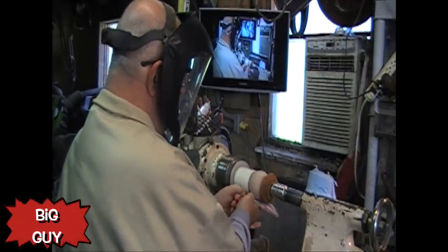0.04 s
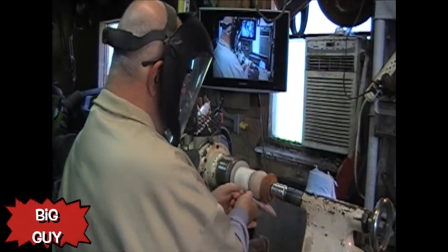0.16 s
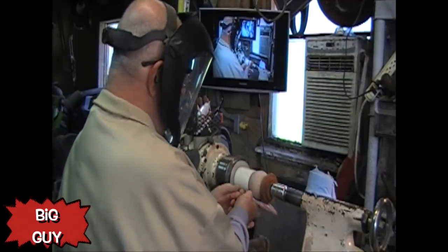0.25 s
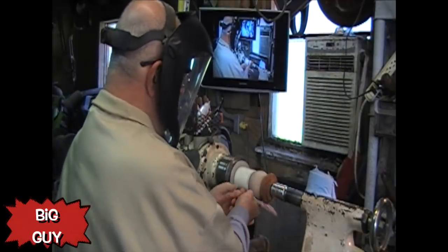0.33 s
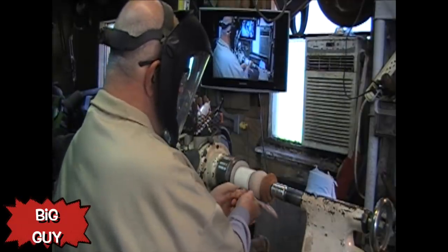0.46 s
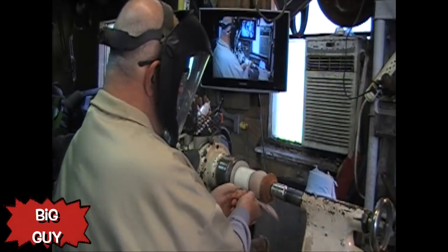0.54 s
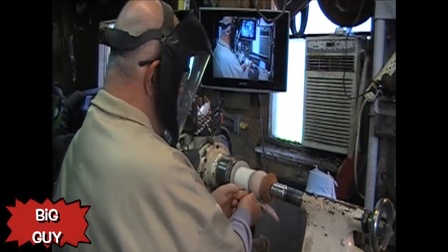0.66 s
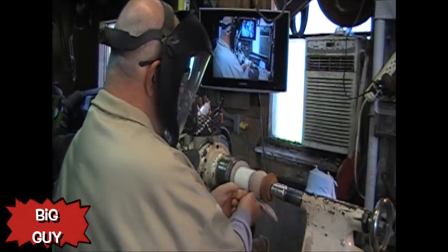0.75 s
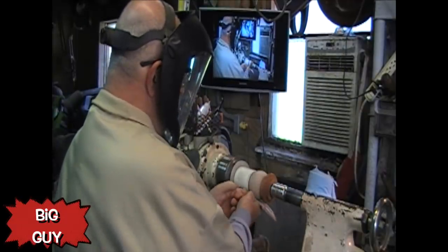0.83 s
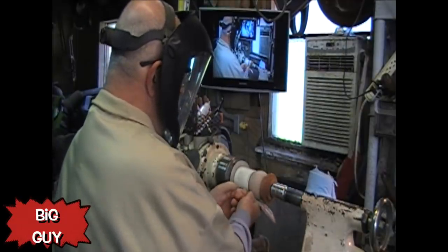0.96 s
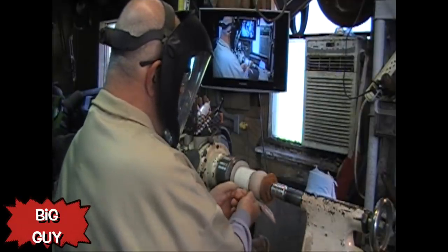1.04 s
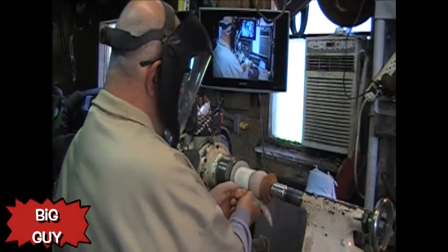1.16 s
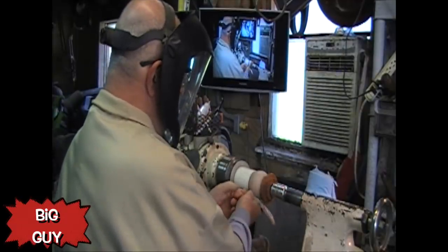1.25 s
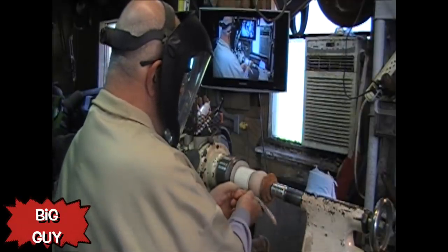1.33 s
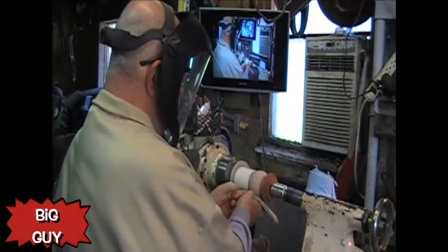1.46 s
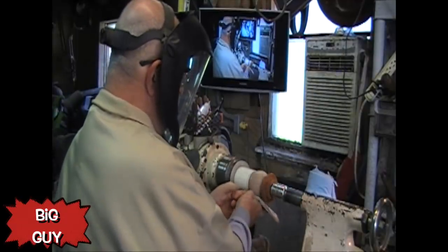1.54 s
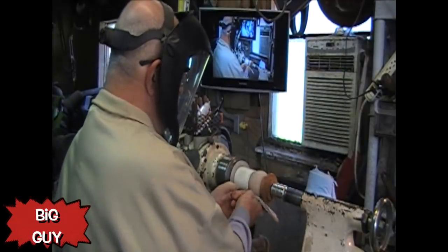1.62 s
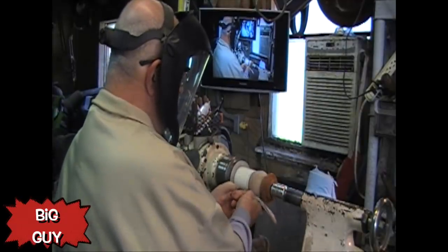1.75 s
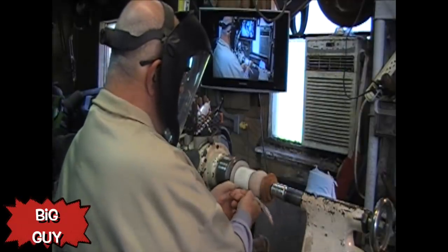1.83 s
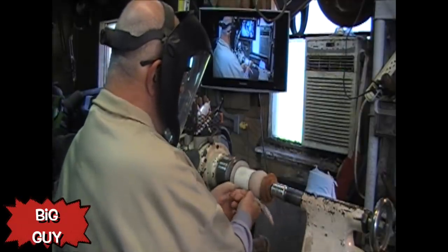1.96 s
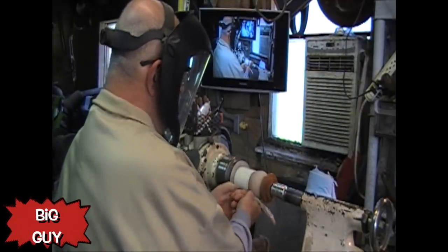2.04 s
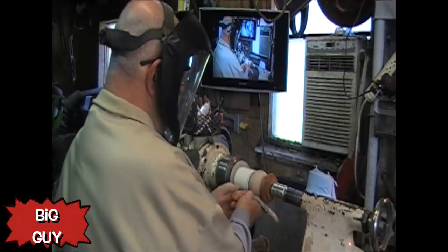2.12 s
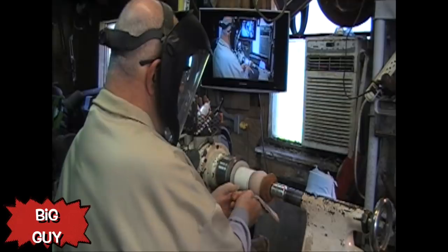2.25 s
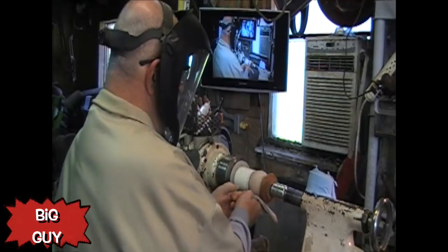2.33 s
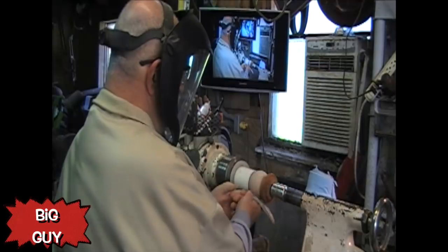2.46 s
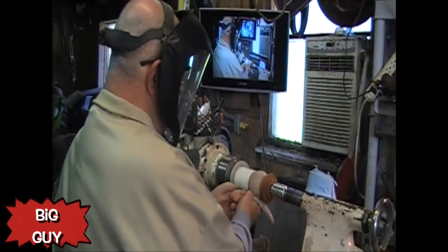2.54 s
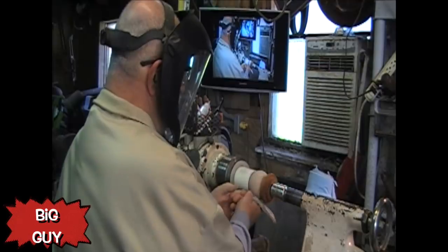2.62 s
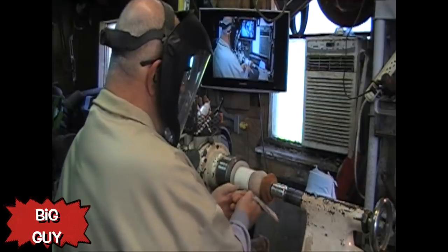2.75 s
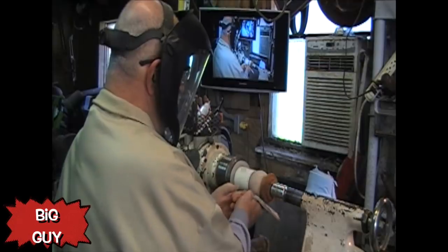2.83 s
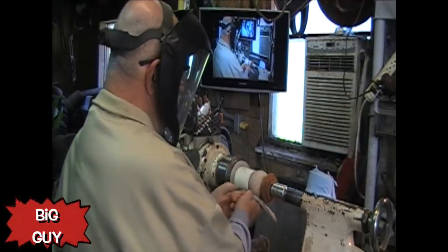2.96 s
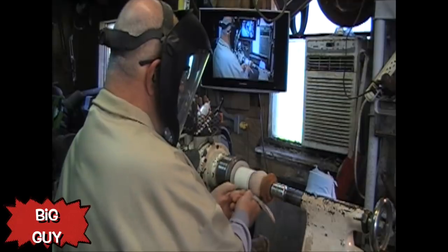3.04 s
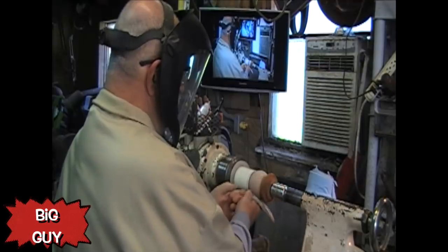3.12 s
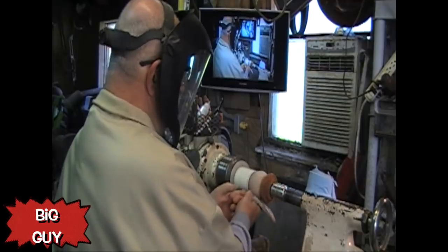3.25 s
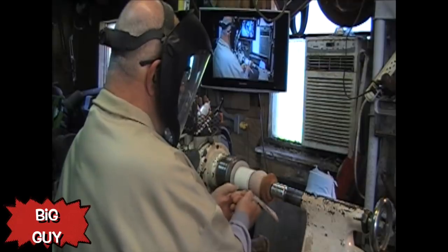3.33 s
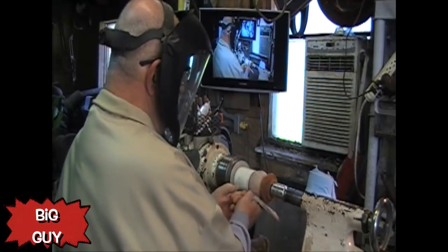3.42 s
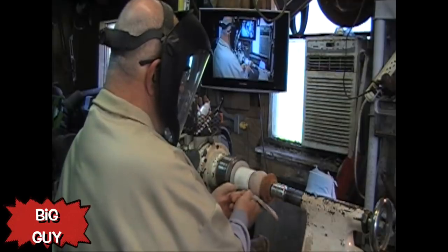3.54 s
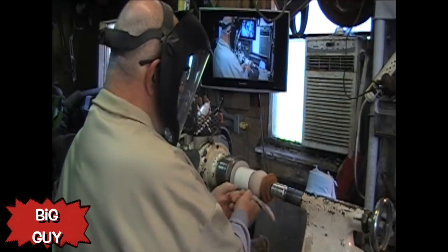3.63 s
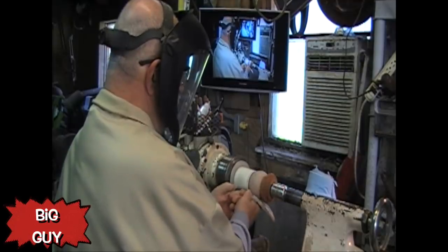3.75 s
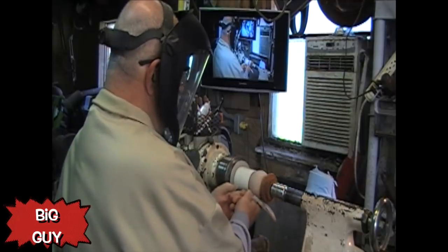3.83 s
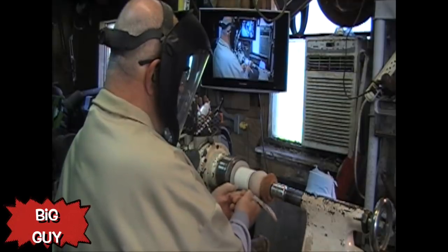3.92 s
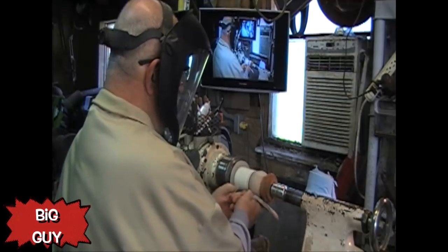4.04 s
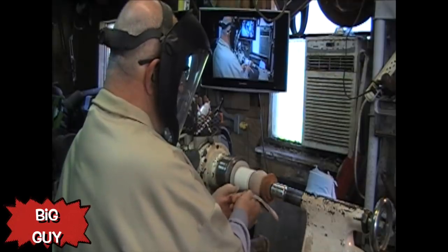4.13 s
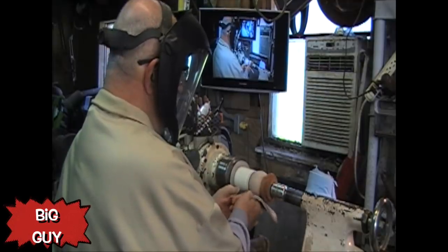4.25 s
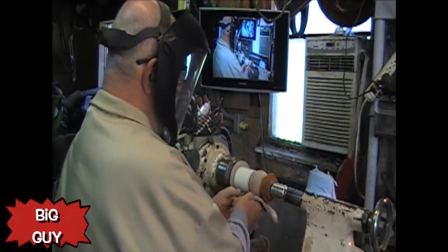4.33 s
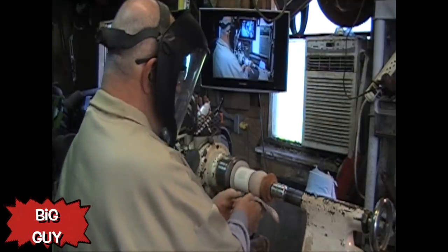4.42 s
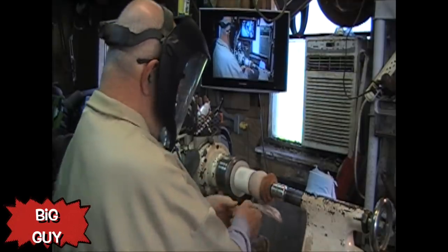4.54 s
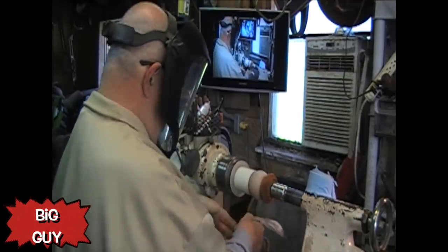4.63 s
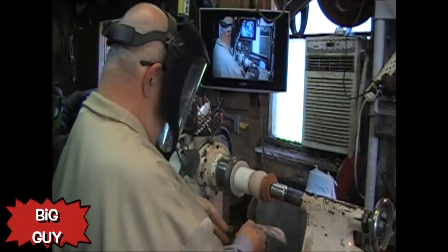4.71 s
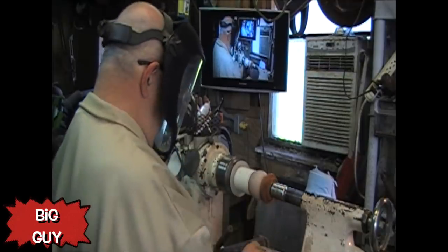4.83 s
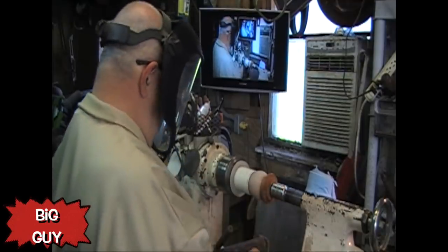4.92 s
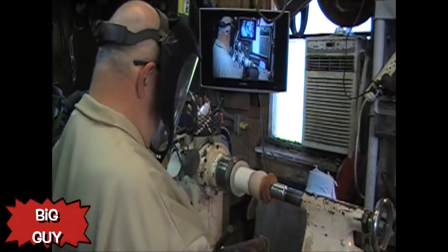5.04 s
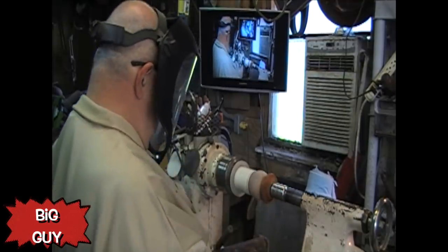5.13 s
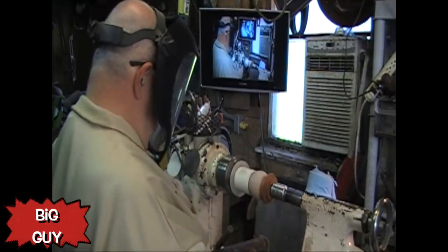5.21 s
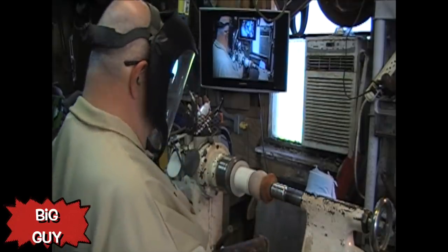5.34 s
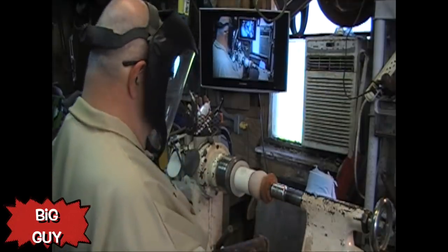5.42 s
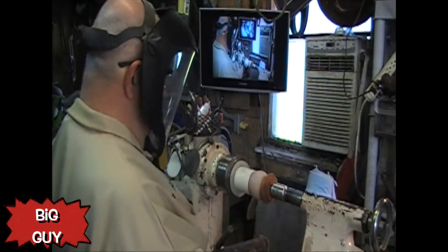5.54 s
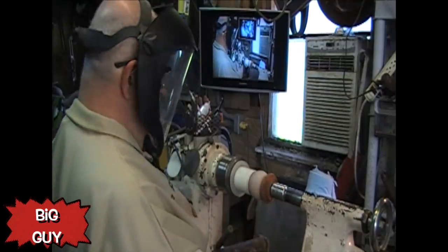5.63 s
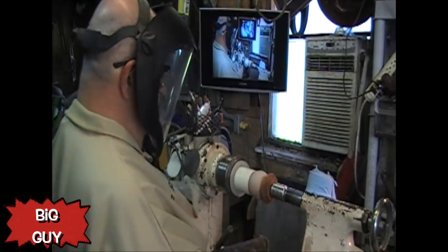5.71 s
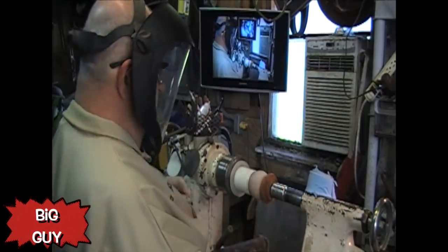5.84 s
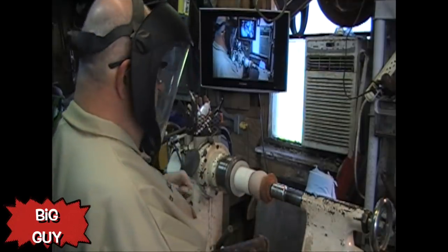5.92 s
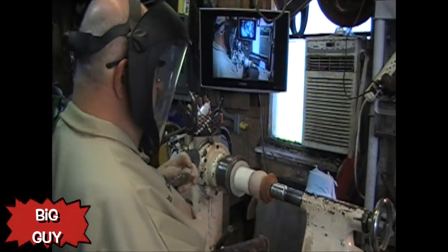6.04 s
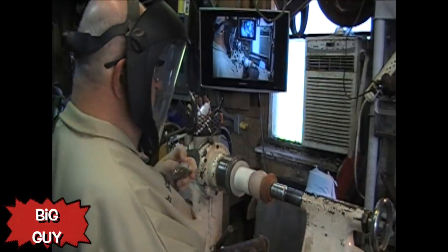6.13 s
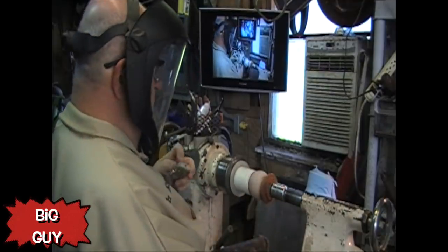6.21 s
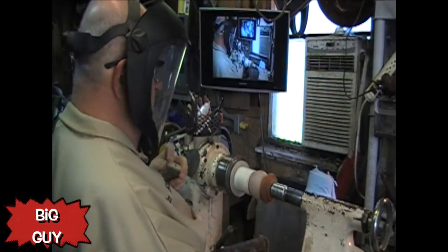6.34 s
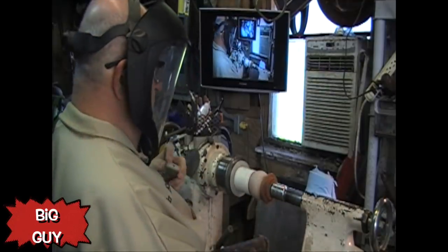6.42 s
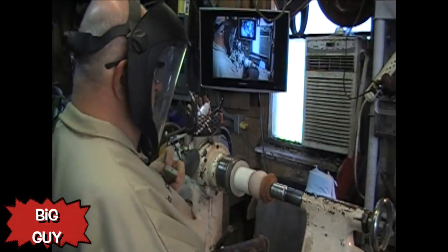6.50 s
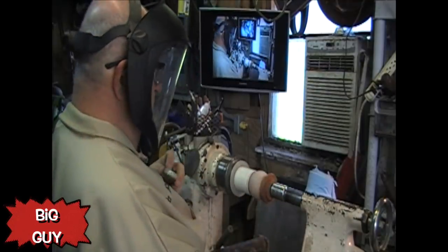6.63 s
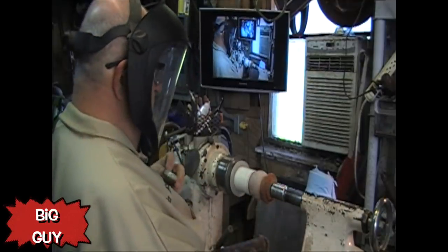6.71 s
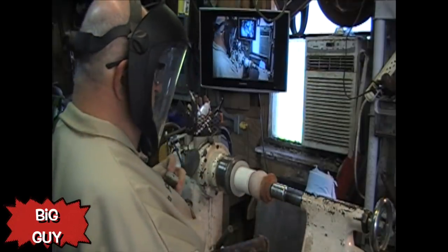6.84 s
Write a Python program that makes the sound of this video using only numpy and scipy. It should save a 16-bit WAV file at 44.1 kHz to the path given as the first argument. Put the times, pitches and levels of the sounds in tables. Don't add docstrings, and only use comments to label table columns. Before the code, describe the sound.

Sandpaper rasps brightly against a wooden ball spinning on a lathe, pulsing with each turn, then lifts off, leaving the motor humming with small knocks.

```python
import sys
import numpy as np
from scipy import signal
from scipy.fft import rfft, irfft, next_fast_len
from scipy.io import wavfile

SR = 44100
rng = np.random.default_rng(int(sys.argv[2]) if len(sys.argv) > 2 else 0)


def volts_from_decibels(level):
    exponent = np.asarray(level, float) / 20
    return 10 ** exponent


def int16_out(signal):
    q = np.round(np.clip(np.atleast_2d(signal).T, -1, 1) * 32767)
    wavfile.write(sys.argv[1], SR, q.astype(np.int16))


N = 302967
T = np.arange(N) / SR
SIZE = next_fast_len(N + SR // 2)
HZ = np.maximum(np.arange(SIZE // 2 + 1) * SR / SIZE, 1)

SANDING_DB, LIFT_S = -23.5, 4.465
BRUSH_DB, BRUSH_S = -18, 0.046
FRESH_UNTIL_S, CLOG_S = 0.63, 0.028
TURN_HZ = 14.91
ROAR_DB, AIR_DB = -40, -78
BELT_HZ, BELT_DB, BELT_ANGLE_RAD = 12, 2.5, 0.2
BED_HZ, BED_WANDER_HZ, SWELL_S = 380.2, 1.76, 0.048
BED_REST_DB, BEAT_HZ, BEAT_DEPTH = -50.5, 7.5, 0.5
SQUEAL_WIDTH_HZ = 74
TICK_T60_S, KNOCK_T60_S = 0.0049, 0.021
SHOP_T60_S, ECHO_DB = 0.17, -13

# [low f/Hz, high f/Hz, index of turn pattern]
VOICES = [(1300, 3000, 0), (3000, 5100, 0), (5100, 6300, 1), (6300, 8000, 1), (8000, 10600, 1),
          (10600, 13200, 2), (13200, 16500, 2)]
# [f/Hz, density/dB per Hz]
CONTACT = [(940, -18), (1600, -16), (2030, -11), (2280, -13), (2780, -6.5), (5020, -9.5), (5730, -2),
           (6600, 1.5), (7420, 2), (8470, 2.5), (9320, 3.5), (11000, -1.5), (12600, -2.5), (14000, -6.5),
           (15600, -11.5)]
# [f/Hz, width/Hz, gain/dB]
PAPER_PEAKS = [(3350, 110, 2.5), (3780, 48, 0), (4080, 60, 2), (4770, 73, 4.5), (7280, 950, 2),
               (7900, 220, 2.5), (9150, 310, -1), (11800, 100, -0.5), (12700, 900, 1)]
# [cycles per turn, then depth/dB and angle/rad for each of three patterns]
TURN = [(1, 1.74, -2.5, 0.94, 2.5, 0.14, -9), (2, 0.58, -2.5, 0.72, -2.5, 0.24, 12),
        (3, 0.24, -5.5, 0.33, -1.5, 0.48, 8), (4, 0.23, -3.5, 0.21, 14.5, 0.16, -12)]
# [t/s, length/s, push/dB, dig of paper edge/dB, skim of its flat/dB]
STROKES = [(0.03, 0.14, 1, 0.5, 0.7), (0.301, 0.32, -0.6, -3, 0.8), (0.443, 0.14, -0.3, 1.5, 1.2),
           (0.601, 0.19, 0.5, 0.2, 1), (0.76, 0.14, 2.5, 0.5, -0.2), (.93, 0.17, 0.8, 0.4, 0),
           (1.036, 0.79, 3, -1.5, .3), (1.3, 0.092, 1, 0, -.3), (1.55, 0.22, -0.7, 0.5, 0.9),
           (1.907, 0.37, 3, -0.45, 0.5), (2.317, 0.18, 0, 1.1, 1.3), (2.533, 0.16, 3.5, 0, 0.5),
           (2.79, 0.085, 0, 0.8, 3), (2.876, 0.27, -0.5, 1.5, 1.3), (3.167, 0.25, 3, -0.8, 0.9),
           (3.427, 0.17, 1.5, 0.5, 1), (3.7, 0.11, .1, -0.1, 1.5), (3.8, 0.31, 4, -0.5, 0.6),
           (4.212, 0.14, 0.5, 0.5, 1.5), (4.445, 0.16, -4.5, 0.4, 1.5)]
# [push share, dig share, skim share, fresh grit gain/dB]
FOLLOWS = [(1.05, 2.1, .05, 0.4), (1.2, 1.3, .05, 1.8), (1.74, -0.1, .05, 5), (.8, 0.12, .2, 3),
           (0.54, 0.18, 1.1, 3.5), (0.51, -0.21, 1.05, 1), (0.9, -0.4, .7, 2.2)]
# [f/Hz, density/dB per Hz]
ROAR = [(15, -71), (25, -37.5), (305, -12.5), (378, -4.5), (432, -7), (1100, -6), (1820, -10.5),
        (2250, -10.5), (2500, -9.5), (3540, -19.5), (4260, -19), (7260, -16.5), (8800, -21), (10300, -30),
        (12900, -36), (13300, -70), (14500, -84)]
# [f/Hz, width/Hz, gain/dB]
BED = [(129.4, 12, 6), (218, 54, 3.5), (661, 240, 4.5), (1136, 60, 1), (1810, 84, 4.5), (2317, 162, -11.5),
       (2417, 60, 6.5), (3730, 180, -2), (4380, 850, 6), (6330, 450, 2.5), (7750, 100, -2)]
# [t/s, peak level/dB rms]
SWELLS = [(0.227, -43.5), (1.143, -42), (1.22, -44), (1.424, -37.5), (1.785, -42.5), (1.939, -43),
          (2.088, -38), (2.302, -40), (2.41, -40), (2.574, -41.5), (2.961, -41), (3.218, -44),
          (3.297, -40.5), (3.535, -39), (3.782, -36.5), (3.889, -43), (4.079, -39.5), (4.229, -42),
          (4.435, -42), (4.592, -40), (4.744, -44), (4.882, -42), (5.075, -38.5), (5.2, -40),
          (5.327, -42.5), (5.454, -41), (5.683, -39.5), (5.993, -44), (6.232, -39), (6.285, -40.5),
          (6.769, -40)]
BED_WAX = 4.2, 4.9, 2.3
HUM_HZ = [479.7, 698.5, 957.7, 1080]
# [level/dB rms, strongest t/s, period/s, depth/dB]
HUM = [(-55, 3.5, 7.1, 0.5), (-60.5, 0.68, 6.5, 8.5), (-58, 3, 10, 5), (-63, 6.5, 12, 1)]
# [f/Hz, level/dB rms]
STEADY_HUM = [(551.7, -67), (645, -61), (798, -58.5), (1297, -70), (2453, -69)]
# [f/Hz, level/dB rms]
WHINE = [(11902, -88), (12059, -86), (12301, -85), (12382, -84), (12538, -76), (12618, -74), (12780, -84),
         (12861, -84)]
# [t/s, length/s]
HISS_SWELLS = [
    (4.87, .04),
    (6.075, .05),
    (6.14, .05),
    (6.585, .04),
]
# [t/s, length/s, f/Hz, level/dB rms]
SQUEALS = [(0.097, 0.21, 4050, -48), (0.7, .1, 4740, -48), (1.2, .1, 3400, -46), (1.32, .14, 4780, -46),
           (1.48, .08, 3380, -47), (1.63, 0.065, 3550, -40), (1.7, .06, 4780, -47), (1.78, .08, 2800, -51),
           (1.95, .12, 4780, -40), (1.972, 0.054, 3350, -47), (2.08, .08, 4780, -45)]
# [t/s, peak level/dB, rasp share/dB, length/s]
SNAGS = [(0.497, -16, -9, .004), (0.748, -16, -12, .004), (1.293, -15, -5, .004), (1.499, -17, -7, .004),
         (1.54, -19, -25, .004), (1.679, -7.5, -25, 0.0046), (1.964, -10, -11, .004),
         (2.5848, -1.5, -12.5, 0.0031), (2.5904, -9.5, -9, 0.0018), (2.7247, -12, -21, 0.006),
         (2.840, -17, -12, .004), (2.896, -17, -7, .004), (2.953, -9, -17, .004), (2.992, -16, -28, .004),
         (3.058, -14, -25, .004), (3.123, -10, -24, .006), (3.6, -18, -18, .004), (3.632, -17, -14, .004),
         (3.821, -16, -14, .004), (4.447, -12, -34, 0.005), (4.5, -38, -12, 0.0072),
         (6.075, -43, -3, 0.022), (6.425, -45, -1, .012), (6.578, -44, -12, 0.008), (6.82, -41, -12, .007)]
# [t/s, peak level/dB, f/Hz]
KNOCKS = [
    (4.6655, -34, 760),
    (4.7305, -30, 1110),
    (4.733, -30, 1650),
    (4.799, -36, 920),
    (6.164, -28, 1080),
]
# [t/s, peak level/dB, f/Hz]
TICKS = [
    (5.993, -50, 9000),
    (6.0715, -44, 11800),
    (6.0718, -40, 8700),
    (6.089, -35, 6500),
    (6.1012, -40, 11500),
    (6.1075, -48, 10500),
    (6.189, -42, 8200),
    (6.582, -50, 9500),
    (6.8205, -48, 9800),
]
# [f/Hz, likeness 0-1, left-right level/dB, right lead/rad]
PAIR_AT_PAPER = [(1200, 0.96, 3.8, 0.06), (2200, 0.98, 1.7, 0.01), (3300, 1.0, 0.0, -0.0),
                 (5300, 1.0, 0.4, 0.0), (6400, 0.98, 2.6, -0.0), (7100, 0.85, 3.7, 0.28),
                 (7700, 0.75, 4.8, 0.76), (8100, 0.71, 2.2, 1.22), (8500, 0.51, -1.5, 1.54),
                 (8900, 0.44, -1.8, 0.33), (9500, 0.59, -0.1, 0.16), (10200, 0.85, 0.1, 0.12),
                 (10800, 0.99, 0.1, 0.01), (15500, 0.99, 0.1, 0.0)]
# [f/Hz, likeness 0-1, left-right level/dB, right lead/rad]
PAIR_AT_LATHE = [(40, 0.72, 1.5, 0.0), (80, 0.8, 3, -0.02), (150, 0.76, 3.7, -0.07), (250, 0.78, 3.8, 0.04),
                 (380, 0.99, 4.0, 0.01), (800, 0.94, 3.9, 0.08), (1500, 0.97, 3.3, 0.04),
                 (2500, 0.96, 2.7, 0.05), (4000, 0.99, 0.5, 0.01), (5500, 0.99, 0.8, 0.0),
                 (6700, 0.97, 1.6, 0.05), (7000, 0.78, 4.1, 0.26), (8500, 0.51, 0.4, 1.87),
                 (10000, 0.27, -0.7, 0.55), (11500, 0.4, -0.0, 0.01), (13000, 0.69, 0.3, 0.13)]


def rms_one(x):
    return x / np.sqrt(np.mean(x ** 2) + 1e-20)


def over_hz(rows):
    first_hz, *rest = np.transpose(rows)
    return [np.interp(np.log(HZ), np.log(first_hz), column) for column in rest]


def humps(peaks):
    return sum(gain_db / (1 + (2 * (HZ - hz) / width_hz) ** 2) for hz, width_hz, gain_db in peaks)


def coloured(x, gain_db):
    return irfft(rfft(x, SIZE) * volts_from_decibels(gain_db), SIZE)[..., :N]


def band(x, low_hz, high_hz, order=3):
    return signal.sosfilt(signal.butter(order, [low_hz, high_hz], "band", fs=SR, output="sos"), x)


def strip(spectrum, low_hz, high_hz):
    below_low, below_high = [.5 + .5 * np.tanh(np.log(edge_hz / HZ) / .05) for edge_hz in (low_hz, high_hz)]
    return irfft(spectrum * (below_high - below_low), SIZE)[:, :N]


def drift(rate_hz):
    r = np.exp(-2 * np.pi * rate_hz * 40 / SR)
    slow = signal.lfilter([1], [1, -2 * r, r * r], rng.standard_normal(N // 40 + 2002))[2000:]
    return np.interp(np.arange(N) / 40, np.arange(len(slow)), rms_one(slow))


def bump(s, length_s):
    return np.exp(-(2 * (T - s) / length_s) ** 2)


def burst(s, length_s):
    since = np.clip((T - s) / length_s, 0, 30) * 2
    return since * np.exp(1 - since)


def waxing(top_s, period_s, depth_db):
    return depth_db * np.cos(2 * np.pi * (T - top_s) / period_s)


def tone(hz, level_db, wobble_rad):
    phase = 2 * np.pi * np.cumsum(hz + 0 * T) / SR
    return np.sqrt(2) * volts_from_decibels(level_db) * np.sin(phase + wobble_rad * drift(4.2) + rng.uniform(0, 7.6))


def grit(per_s, spread_db):
    sizes = volts_from_decibels(spread_db * np.minimum(rng.exponential(1, (2, N)), 5))
    signs = rng.choice([-1, 1], (2, N))
    caught = rng.random((2, N)) < per_s / SR
    return rms_one(sizes * signs * caught)


def hand():
    push_db, dig_db, skim_db = sum(np.outer(levels_db, bump(s, length_s)) for s, length_s, *levels_db in STROKES)
    fresh = .5 - .5 * np.tanh((T - FRESH_UNTIL_S) / CLOG_S)
    return [a * push_db + b * dig_db + c * skim_db + fresh_db * fresh for a, b, c, fresh_db in FOLLOWS]


def ball_turn(pattern):
    depth, angle = 1 + 2 * pattern, 2 + 2 * pattern
    turn_db = sum(row[depth] * np.cos(2 * np.pi * row[0] * TURN_HZ * T + row[angle]) for row in TURN)
    return 0.96 * turn_db * (1 + 0.18 * drift(1.0))


def flecked(spectrum, low_hz, high_hz, fleck_db, count=2):
    edges_hz = np.geomspace(low_hz, high_hz, count + 1)
    return sum(strip(spectrum, a, b) * volts_from_decibels(fleck_db * (drift(27) + .5 * drift(6.3)))
               for a, b in zip(edges_hz, edges_hz[1:]))


def sandpaper():
    contact_db = over_hz(CONTACT)[0] + humps(PAPER_PEAKS)
    clicks = rfft(rms_one(coloured(grit(per_s=30000, spread_db=3.0), contact_db)), SIZE)
    lift_db = BRUSH_DB * np.clip((T - LIFT_S) / 0.0066, 0, 1)
    lift_db -= 60 * np.clip((T - LIFT_S - BRUSH_S) / .012, 0, 1)
    tremor_db = 0.37 * drift(6.5) + 0.39 * drift(89)
    out = 0
    for level_db, (low_hz, high_hz, pattern) in zip(hand(), VOICES):
        change_db = level_db - level_db[T < LIFT_S].mean()
        gain = volts_from_decibels(change_db + lift_db + ball_turn(pattern) + tremor_db)
        out = out + gain * flecked(clicks, low_hz, high_hz, fleck_db=0.82)
    return volts_from_decibels(SANDING_DB) * out


def roar():
    noise = rfft(rng.standard_normal((2, N)), SIZE) * volts_from_decibels(over_hz(ROAR)[0] + humps(BED))
    out, together = 0, drift(4.3)
    for low_hz, high_hz, belt_share in [(5, 597, 0), (610, 1243, 0.059), (1262, 2550, 0.12),
                                        (2590, 5000, 0.47), (4950, 20000, 0.38)]:
        throb_db = belt_share * BELT_DB * np.cos(2 * np.pi * BELT_HZ * T + BELT_ANGLE_RAD)
        flicker_db = 0.5 * together + 0.61 * drift(19.0)
        out = out + strip(noise, low_hz, high_hz) * volts_from_decibels(throb_db + flicker_db)
    return volts_from_decibels(ROAR_DB) * rms_one(out)


def bed_mode():
    beat = 1 + BEAT_DEPTH * np.sin(2 * np.pi * BEAT_HZ * T + 2.0 * drift(2.46))
    rest = volts_from_decibels(BED_REST_DB + waxing(*BED_WAX)) * np.maximum(beat, .05)
    swelling = np.minimum(sum(bump(s, SWELL_S) for s, _ in SWELLS), 1)
    swells = sum(volts_from_decibels(peak_db - 1.0) * bump(s, SWELL_S) for s, peak_db in SWELLS)
    drone = tone(BED_HZ + BED_WANDER_HZ * drift(3.04), 0, wobble_rad=0.3)
    return (swells + rest * (1 - swelling)) * drone


def motor_lines():
    hum = sum(tone(hz, level_db + waxing(*wax) + 2.3 * drift(8.0), wobble_rad=0.8)
              for hz, (level_db, *wax) in zip(HUM_HZ, HUM))
    hum += sum(tone(hz, level_db + 2.2 * drift(7), wobble_rad=1.1) for hz, level_db in STEADY_HUM)
    return bed_mode() + hum


def whine():
    left = volts_from_decibels(5.5) * sum(tone(hz, level_db, wobble_rad=.15) for hz, level_db in WHINE)
    return np.array([left, 0.39 * (left + np.roll(left, 1))])


def air():
    white = rng.standard_normal(N)
    patches = np.clip(4 * drift(9) - .5, 0, 1)
    lifted = sum(bump(s, length_s) for s, length_s in HISS_SWELLS)
    hiss = patches * rms_one(band(white, 13100, 13700, order=7))
    rustle = volts_from_decibels(1.0) * lifted * rms_one(band(white, 13000, 14450, order=7))
    return volts_from_decibels(AIR_DB) * (hiss + rustle)


def squeals():
    white = rng.standard_normal(N)
    half_hz = SQUEAL_WIDTH_HZ / 2
    return sum(volts_from_decibels(level_db) * bump(s, length_s) * rms_one(band(white, hz - half_hz, hz + half_hz, order=1))
               for s, length_s, hz, level_db in SQUEALS)


def snags():
    coarse = grit(per_s=20000, spread_db=2.0)
    bright = rms_one(band(coarse, 5500, 12600, order=7))
    rasp = rms_one(band(coarse, 3420, 4140))
    return sum(volts_from_decibels(peak_db - 12.0) * burst(s, length_s) * (bright + volts_from_decibels(rasp_db + 4.5) * rasp)
               for s, peak_db, rasp_db, length_s in SNAGS)


def struck(hits, t60_s):
    out = np.zeros(N + SR)
    since_s = np.arange(SR // 10) / SR
    for s, peak_db, hz in hits:
        start = int(s * SR)
        contact = np.sin(np.pi / 2 * np.minimum(since_s * hz / 1.5, 1)) ** 2
        decay = volts_from_decibels(peak_db - 60 * since_s / t60_s)
        out[start:start + len(since_s)] += decay * contact * np.sin(2 * np.pi * hz * since_s)
    return out[:N]


def knocks():
    return struck(KNOCKS, KNOCK_T60_S)


def ticks():
    return struck(TICKS, TICK_T60_S)


def shop():
    s = np.arange(SR // 3) / SR
    echoes = rng.standard_normal(len(s)) * volts_from_decibels(-60 * s / SHOP_T60_S) * (s > .003)
    echoes = band(echoes, 590, 8600, order=1)
    response = volts_from_decibels(ECHO_DB) * echoes / np.sqrt(np.sum(echoes ** 2))
    response[0] = 1
    return rfft(response / np.sqrt(np.sum(response ** 2)), SIZE)


def microphones(twins, pair):
    alike, balance_db, lead_rad = over_hz(pair)
    one, other = rfft(twins, SIZE) * shop()
    right = alike * np.exp(1j * lead_rad) * one + np.sqrt(1 - alike ** 2) * other
    return irfft([one * volts_from_decibels(balance_db / 2), right * volts_from_decibels(-balance_db / 2)], SIZE)[:, :N]


def scene():
    paper = microphones(sandpaper() + snags() + ticks(), PAIR_AT_PAPER)
    lathe = microphones(roar() + knocks(), PAIR_AT_LATHE)
    lines = motor_lines() * volts_from_decibels([[1.8], [-1.8]])
    return paper + lathe + lines + whine() + air() + squeals()


def low_pass(x):
    return signal.sosfilt(signal.butter(12, 15740, fs=SR, output="sos"), x)


def record(dry):
    thin = signal.sosfilt(signal.butter(2, 50, "high", fs=SR, output="sos"), dry)
    return low_pass(thin)


dry = scene()
out = record(dry)
int16_out(out)
```